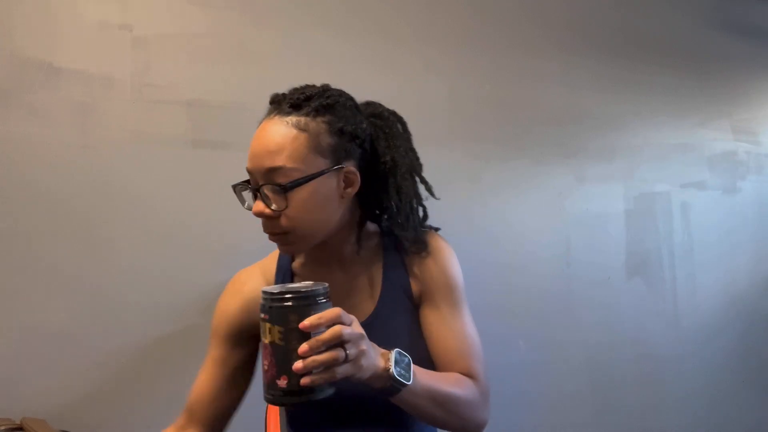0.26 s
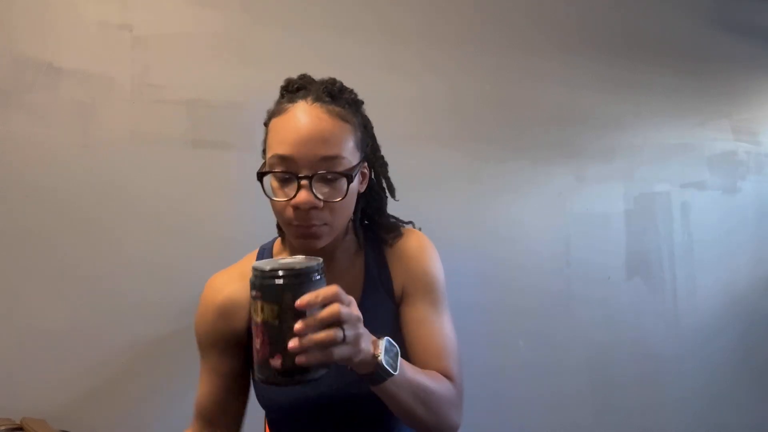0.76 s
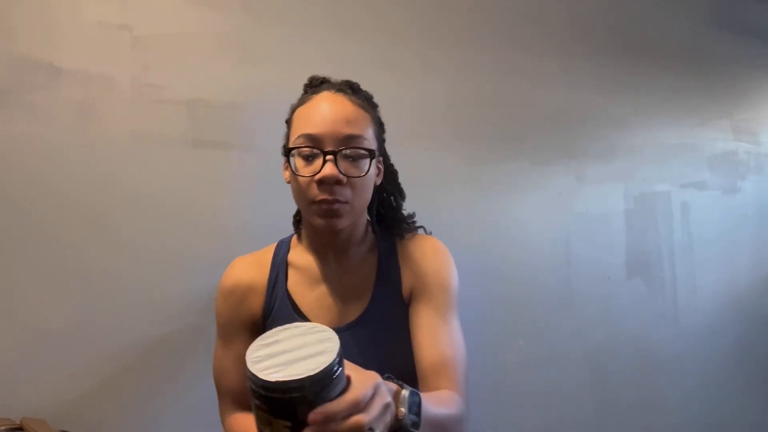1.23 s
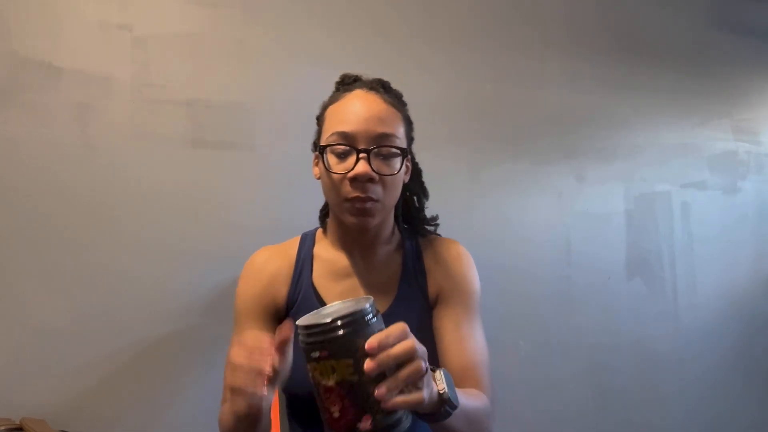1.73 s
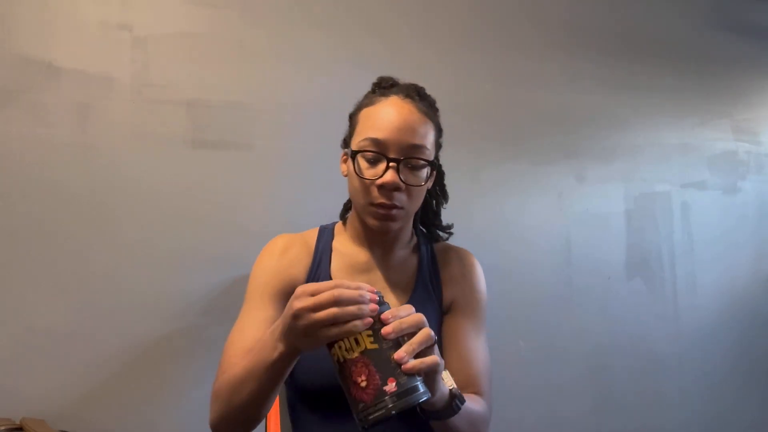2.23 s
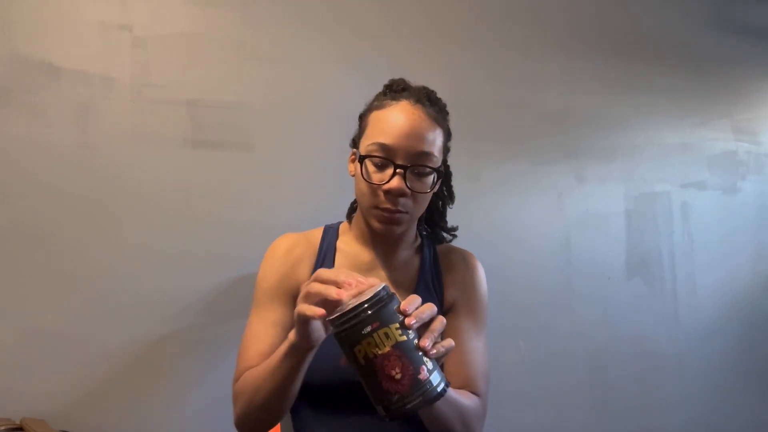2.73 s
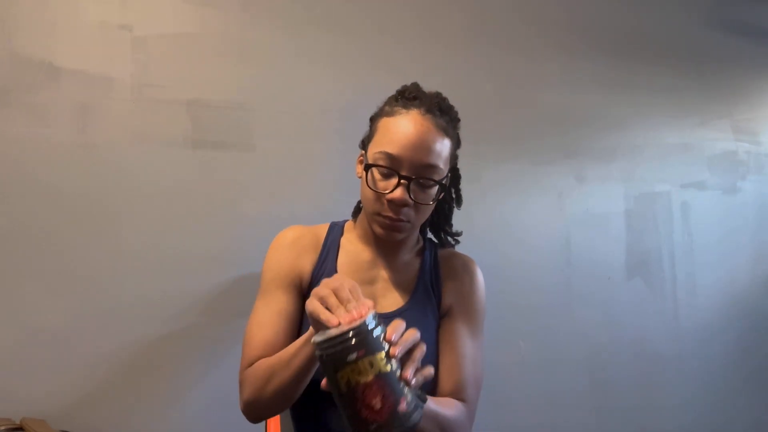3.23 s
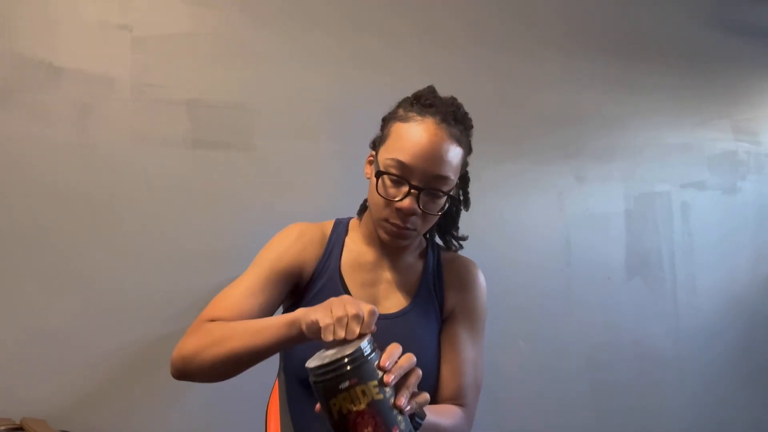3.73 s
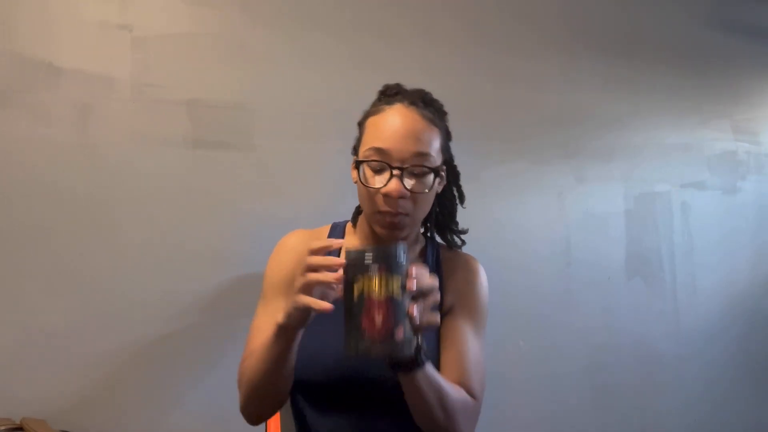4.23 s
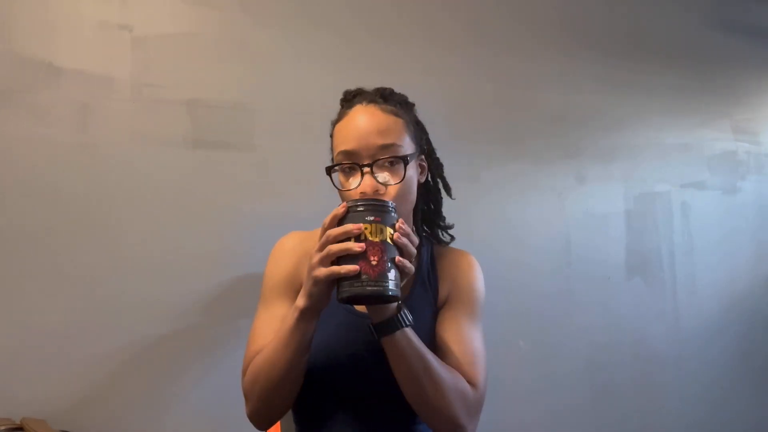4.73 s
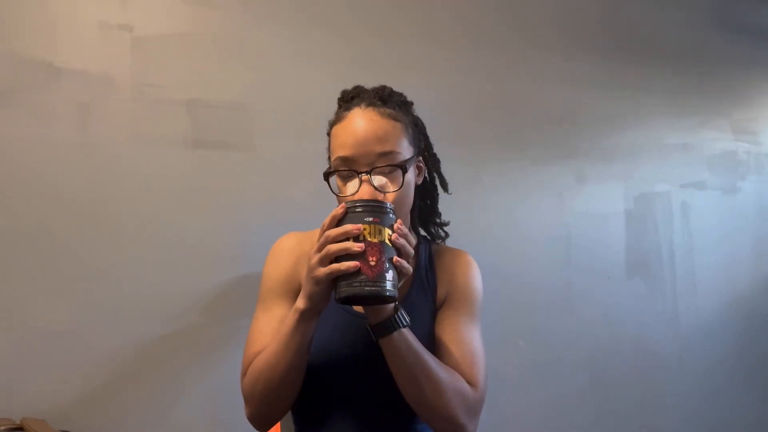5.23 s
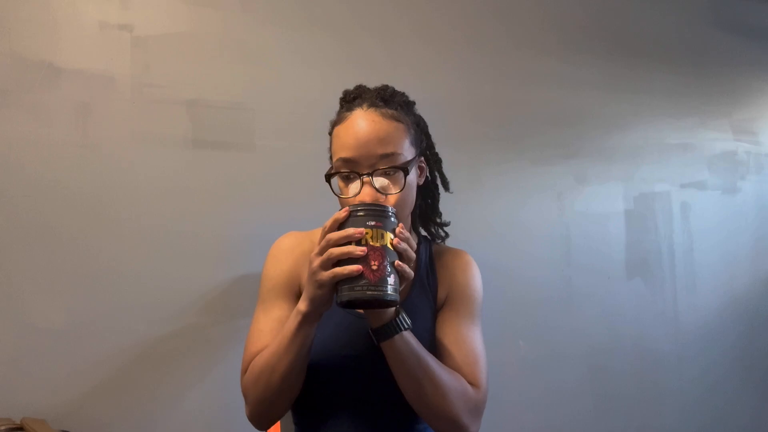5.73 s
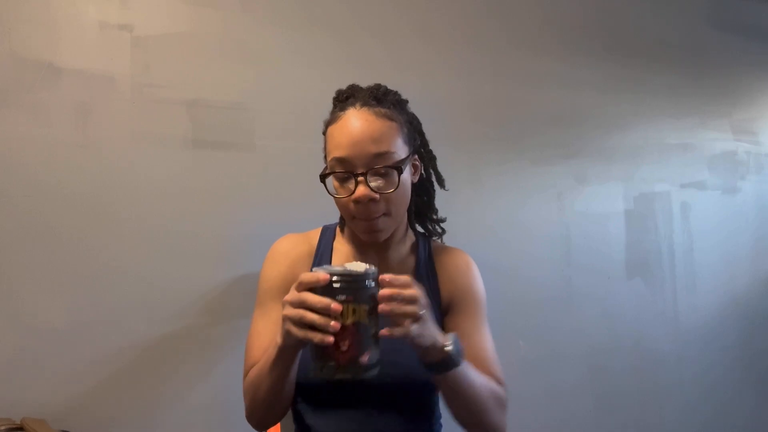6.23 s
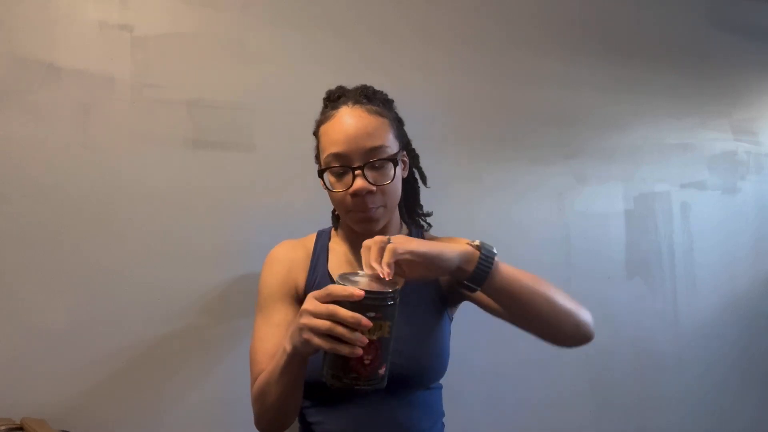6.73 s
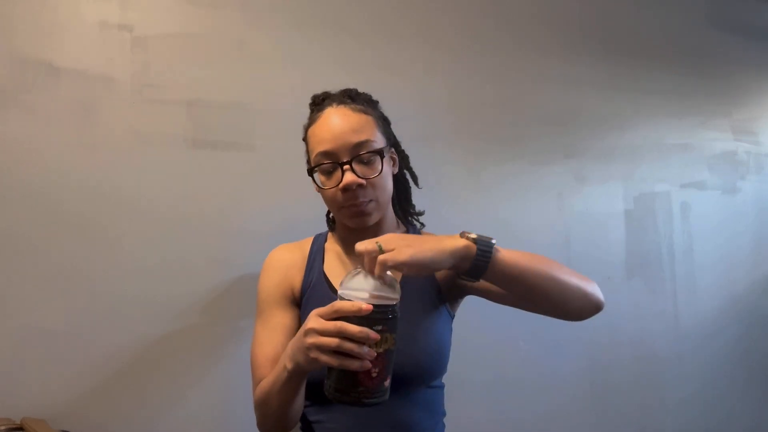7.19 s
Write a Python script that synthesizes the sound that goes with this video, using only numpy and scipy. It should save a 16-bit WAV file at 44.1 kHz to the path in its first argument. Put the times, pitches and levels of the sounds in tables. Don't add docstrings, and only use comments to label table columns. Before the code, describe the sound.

Hollow plastic knocks and small foil snaps over faint low rumble, indoors, then a brighter burst of crackly tearing as the seal lifts.

```python
import sys
import numpy as np
from scipy import signal
from scipy.fft import rfft, irfft, next_fast_len
from scipy.io import wavfile

SR = 44100
rng = np.random.default_rng(int(sys.argv[2]) if len(sys.argv) > 2 else 0)


def master(y):
    cut = np.clip(np.atleast_2d(y).T, -1, 1)
    pcm = np.round(cut * 32767)
    wavfile.write(sys.argv[1], SR, pcm.astype(np.int16))


def to_linear_factor(level_db):
    exponent = np.asarray(level_db, float) / 20
    return 10 ** exponent


N = 328809


def rms_one(x):
    return x / np.sqrt(np.mean(x ** 2) + 1e-20)


def in_time(rows):
    s, *columns = np.transpose(rows)
    return [np.interp(np.arange(N) / SR, s, c) for c in columns]


def while_sounding(rows):
    t = np.arange(N) / SR
    return (t >= rows[0][0]) & (t <= rows[-1][0])


def at_hz(points, hz):
    points_hz, values = np.array(points)[:, 0], np.array(points)[:, 1]
    return np.interp(np.log(np.maximum(hz, 1)), np.log(points_hz), values)


def colour(x, spectrum):
    size = next_fast_len(x.shape[-1])
    gain = to_linear_factor(at_hz(spectrum, np.fft.rfftfreq(size, 1 / SR)))
    return irfft(rfft(x, size) * gain, size)[..., :x.shape[-1]]


def band(x, low_hz, high_hz):
    return signal.sosfilt(signal.butter(2, [low_hz, high_hz], "band", fs=SR, output="sos"), x + 1e-18)


def drift(rate):
    r = np.exp(-80 * np.pi * rate / SR)
    noise = rng.standard_normal(N // 40 + 2002)
    slow = signal.lfilter([1], [1, -2 * r, r * r], noise)[2000:]
    return np.interp(np.arange(N) / 40, np.arange(len(slow)), rms_one(slow))


def ring(clicks, hz, t60):
    r, w = to_linear_factor(-60 / (t60 * SR)), 2 * np.pi * hz / SR
    return signal.lfilter([0, np.sin(w)], [1, -2 * r * np.cos(w), r * r], clicks + 1e-18)


def strike(rows, modes):
    rows, out = np.array(rows), np.zeros(N)
    luck = rng.standard_normal((len(rows), len(modes)))
    for k, (hz, level_db, t60) in enumerate(modes):
        clicks = np.zeros(N)
        clicks[(rows[:, 0] * SR).astype(int)] = to_linear_factor(rows[:, 1] + level_db + 3.5 * luck[:, k])
        out += ring(clicks, hz, t60) * (-1) ** k
    return out


def grains(per_s, spread_db):
    sizes = to_linear_factor(spread_db * np.minimum(rng.exponential(1, N), 5)) * rng.choice([-1, 1], N)
    return rms_one(sizes * (rng.random(N) < per_s / SR))


def stereo_bands(likeness, length, gain):
    out, edges = 0, 25 * 2 ** np.arange(0, 9.6, .5)
    white = rng.standard_normal((2, 2, length))
    for k, (low, high) in enumerate(zip(edges, edges[1:])):
        mid, side = band(white[k % 2], low, high)
        hz = np.sqrt(low * high)
        alike = np.clip(at_hz(likeness, hz), -1, 1)
        out = out + gain(hz) * (np.sqrt(1 + alike) * mid + np.sqrt(1 - alike) * side * [[1], [-1]])
    return out


# pitch_hz [Hz], level_db [dB per Hz]
FLOOR_SPECTRUM = [(24, -68), (40, -12.5), (90, -15), (102, -11.5), (124, -10.5), (180, -33), (225, -18.5),
                  (267, -21), (2580, -50.5), (6000, -54.5), (14500, -62.5)]
# start_s [s], level_db [dB]
FLOOR_LULL = [
    (4.87, -55.5),
    (5.03, -61),
    (5.5, -61.5),
    (6.84, -56.5),
]
# pitch_hz [Hz], likeness [-1..1]
FLOOR_LIKENESS = [(40, 1), (130, 0.46), (300, 0.37), (1000, 0.33), (8000, 0.19)]
# pitch_hz [Hz], width_hz [Hz], level_db [dB rms]
DUCT_MURMURS = [(69.4, 28, -66), (218.9, 23, -70)]
# pitch_hz [Hz], level_db [dB rms]
MAINS_HUM = [(120, -64)]


def floor():
    together, t, level_db = drift(4.5), np.arange(N) / SR, in_time(FLOOR_LULL)[0]
    swing_db = level_db - level_db.mean() + 0.6 * together

    def level(hz):
        unrest = np.clip(np.log2(1200 / hz) / 2, .1, 1)
        return to_linear_factor(at_hz(FLOOR_SPECTRUM, hz) + unrest * (swing_db + 3.5 * drift(3.6)))

    rumble = rms_one(band(stereo_bands(FLOOR_LIKENESS, N, level), 42, 14000))
    murmurs = 0
    for hz, width_hz, db in DUCT_MURMURS:
        noise = band(rng.standard_normal(N), hz - width_hz / 2, hz + width_hz / 2)
        murmurs = murmurs + to_linear_factor(db) * rms_one(noise)
    hum = 0
    for hz, db in MAINS_HUM:
        height = np.sqrt(2) * to_linear_factor(db + 2.1 * drift(5.2))
        hum = hum + height * np.sin(2 * np.pi * hz * t + .5 * drift(2.4))
    return to_linear_factor(level_db.mean() - 5.5) * rumble + murmurs + hum


# pitch_hz [Hz], t60_s [s]
ROOM_T60 = [(150, 1), (500, 0.71), (1400, 0.66), (3700, 0.49), (9000, 0.43), (15000, 0.077)]
# pitch_hz [Hz], level_db [dB]
ROOM_LEVEL = [(150, 4), (500, 1.5), (1500, -1), (5000, -1), (9000, -9), (15000, -4)]
# pitch_hz [Hz], likeness [-1..1]
TAIL_LIKENESS = [(150, 1), (400, 0.065), (3000, 0.067), (7000, 0.76), (9500, 0.27), (12000, 0.33),
                 (15000, 0.93)]


def room(x):
    t = np.arange(SR) / SR
    rise = np.clip((t - .003) / 0.0013, 0, 1)

    def decay(hz):
        t60 = at_hz(ROOM_T60, hz)
        unit_energy = np.sqrt(6 * np.log(10) / t60 / SR)
        return to_linear_factor(at_hz(ROOM_LEVEL, hz) - 60 * t / t60 - 9.6 * t ** 2) * unit_energy

    tail = rise * stereo_bands(TAIL_LIKENESS, SR, decay)
    size = next_fast_len(N + SR)
    return irfft(rfft(x, size) * (1 + rfft(tail, size)), size)[:, :N]


# pitch_hz [Hz], level_db [dB per Hz]
FOIL_SPECTRUM = [(700, -66), (1100, 8), (1400, 3), (2100, 3), (2750, 0.5), (4100, -0.5), (6200, -3.5),
                 (8300, -5), (10300, -8.5), (12000, -15.5), (15000, -9), (16000, -17), (16600, -65)]
# start_s [s], length_s [s], level_db once moving [dB], change_db by the end [dB]
RUBS = [(0.392, 0.18, -44, -16), (0.839, 0.2, -76.5, -16), (1.855, 0.25, -73, 3), (3.324, 0.2, -73.5, 13.5),
        (4.243, 0.3, -70, -7.5), (4.745, 0.1, -64.5, -14), (5.41, 0.12, -85.5, -6),
        (5.862, 0.3, -71.5, 4.5), (6.604, 0.18, -64.5, -40)]


def rubs():
    hiss = rms_one(colour(grains(5000, spread_db=2.5), FOIL_SPECTRUM))
    attack_s, touch_db = 0.01, -16.5
    level = 0
    for s, length, db, change_db in RUBS:
        stroke = [(s, db + touch_db), (s + attack_s, db), (s + length, db + change_db)]
        level = level + while_sounding(stroke) * to_linear_factor(in_time(stroke)[0])
    return hiss * level


# start_s [s], length_s [s],
# level_db [dB], pitch_hz [Hz], width_hz [Hz]
SCRATCHES = [(0.0, 0.017, -67.5, 1160, 1620), (0.854, 0.1, -73.5, 4940, 1520),
             (3.823, 0.01, -61, 1420, 300), (6.704, 0.081, -73, 1340, 700), (2.343, 0.044, -66, 5760, 895),
             (3.127, 0.013, -63, 4100, 700), (3.665, 0.026, -57, 2160, 688), (4.756, 0.032, -62, 4850, 500),
             (4.76, 0.034, -69, 2500, 815), (6.663, 0.022, -57, 1950, 680), (6.617, 0.017, -65, 3760, 905)]


def scratches():
    out = np.zeros(N)
    noises = rng.standard_normal((len(SCRATCHES), 8192))
    for (s, length, level_db, hz, width_hz), noise in zip(SCRATCHES, noises):
        t = np.arange(8192) / SR / length
        stroke = np.minimum(8 * t, 1) * np.clip(1.5 - t, 0, 1)
        tone = rms_one(band(noise, hz - width_hz / 2, hz + width_hz / 2))
        out[int(s * SR):int(s * SR) + 8192] += to_linear_factor(level_db) * stroke * tone
    return out


# start_s [s], level_db [dB peak]
THUDS = [
    (.197, -49.5),
    (.403, -34),
    (.47, -53),
    (1.21, -59),
    (1.26, -54),
    (7.3, -52),
]
# pitch_hz [Hz], level_db [dB], t60_s [s]
TABLE_MODES = [(123, -10.5, 0.1), (185.7, 0, 0.055), (246, -2, 0.035)]
# pitch_hz [Hz], level_db [dB], t60_s [s]
TUB_MODES = [(425, -9.5, 0.025), (500, -11, 0.042), (570, -11, 0.029), (736, -7, 0.031), (807, -4, 0.015),
             (1016, -16, 0.047), (1107, -8.5, 0.011), (1420, -14, 0.012)]
# start_s [s], level_db [dB peak], pitch_hz [Hz]
GRIPPED_KNOCKS = [(.403, -31, 345), (.435, -37.5, 400), (.529, -40, 472), (1.109, -33.5, 530),
                  (1.599, -70, 589), (1.95, -35.5, 395), (2.062, -40, 710), (2.314, -44.5, 336),
                  (2.35, -44.5, 482), (2.434, -37, 327), (2.75, -28.5, 430), (2.97, -54, 851),
                  (3.342, -35, 686), (3.398, -32, 700), (3.435, -39.5, 513), (3.744, -42.5, 540),
                  (4.306, -41, 708), (4.341, -43.5, 563), (4.399, -38.5, 477), (4.755, -42.5, 485),
                  (4.837, -44.5, 588), (5.631, -36, 799), (5.713, -31.5, 503), (5.972, -47, 390),
                  (6.094, -25, 712), (6.583, -46, 487), (6.665, -46.5, 574), (6.983, -34, 780)]
# start_s [s], level_db [dB peak], pitch_hz [Hz]
LOOSE_KNOCKS = [(.197, -47.5, 480), (.382, -38.5, 735), (.417, -37, 726), (.475, -31, 548),
                (.589, -46, 504), (.855, -43.5, 536), (0.892, -45, 470), (.964, -70, 480),
                (1.139, -38.5, 585), (1.169, -47, 508), (1.357, -48.5, 495), (1.512, -93, 370),
                (1.568, -58, 581), (1.956, -36.5, 600), (2.459, -44.5, 435), (2.785, -37, 546),
                (2.803, -37.5, 640), (2.89, -49, 714), (2.896, -29.5, 807), (3.665, -48.5, 534),
                (3.932, -46, 456), (3.943, -36, 561), (4.18, -46.5, 475), (4.257, -48, 382),
                (4.354, -42.5, 564), (4.442, -33.5, 502), (4.496, -52, 437), (6.183, -40, 610),
                (6.563, -66, 380), (6.884, -50, 363)]


def knocks():
    gripped_cycles, loose_cycles = 12.2, 32.5
    rows = [(*row, gripped_cycles) for row in GRIPPED_KNOCKS]
    rows = sorted(rows + [(*row, loose_cycles) for row in LOOSE_KNOCKS])
    tub, t = strike(rows, TUB_MODES), np.arange(4096) / SR
    for s, peak_db, hz, cycles in rows:
        note = to_linear_factor(peak_db - 1.0 - 60 * t * hz / cycles) * np.sin(2 * np.pi * hz * t)
        tub[int(s * SR):int(s * SR) + len(t)] += note
    hollow = band(band(tub, 303, 1900), 230, 2600)
    return hollow + band(strike(THUDS, TABLE_MODES), 130, 300)


# start_s [s], crack_db of plastic [dB], snap_db of foil [dB], pitch_hz of crack [Hz]
PAD_TAPS = [(0.8534, -43.5, -44.5, 2470), (1.048, -62, -55.5, 2530), (1.1104, -45, -56.5, 1570),
            (1.138, -47.5, -60, 2040), (1.955, -32.5, -34, 1420), (2.7537, -28, -39.5, 1530),
            (2.786, -48, -46, 1780), (2.8006, -40, -48, 1420), (2.8977, -28, -29.5, 1320),
            (2.9007, -41, -32, 1650), (2.982, -40.5, -39, 1960), (3.744, -37.5, -45, 2960),
            (3.7452, -37, -48.5, 1340), (3.9232, -73, -39, 1730), (3.933, -35.5, -39, 3320),
            (4.3078, -43, -55, 1410), (4.4018, -46, -62, 1390), (4.4425, -41.5, -51.5, 1730),
            (4.7548, -42, -44, 2110), (4.8378, -43, -55.5, 1400), (5.634, -33, -30, 2430),
            (5.66, -37, -23, 2700), (5.7145, -35, -33, 2010), (5.9747, -47, -44.5, 3260),
            (6.096, -34.5, -35, 1820), (6.183, -44.5, -49.5, 2600), (6.6627, -44, -72, 2040),
            (6.9228, -49.5, -43, 3230), (7.0643, -36, -18, 2160), (7.3389, -38, -24, 2100)]
# start_s [s], crack_db of plastic [dB], snap_db of foil [dB], pitch_hz of crack [Hz]
CREASES = [(0.1975, -54, -96, 1420), (0.402, -50, -36, 3000), (.409, -31.5, -37, 1320),
           (0.4159, -28, -26, 1420), (0.4364, -54, -49, 1550), (.8944, -59, -57, 2330),
           (1.3571, -58.5, -86, 1550), (1.733, -68, -76, 2640), (1.868, -71, -61, 2600),
           (2.0635, -40.5, -74.5, 1950), (2.3143, -52.5, -58.5, 1510), (2.436, -46, -46.5, 2290),
           (2.817, -36.5, -37, 2000), (3.344, -40.5, -73, 1760), (3.4454, -34.5, -32.5, 2620),
           (3.665, -52, -91, 2600), (3.947, -39, -40, 1640), (4.35, -46.5, -73, 1370),
           (4.495, -54, -78, 2530), (5.5946, -34, -42, 3080), (5.6118, -38, -47, 2230),
           (5.6213, -33.5, -36, 2100), (6.618, -62, -61, 2730), (6.884, -48.5, -53.5, 2030),
           (6.994, -42, -28, 2270), (7.0106, -45, -28, 2270), (7.027, -36, -20, 2480),
           (7.0826, -22, -27, 3000), (7.124, -23.5, -42, 2960), (7.3961, -22, -20, 3150)]
# start_s [s], crack_db of plastic [dB], snap_db of foil [dB], pitch_hz of crack [Hz],
# tick_db against the snap [dB]
NAIL_PICKS = [(.382, -36.5, -42, 3420, -3), (0.751, -58, -68, 1470, 0), (2.2795, -63, -61, 1650, 1),
              (2.351, -47, -40, 2250, -8), (2.4465, -45, -62, 2030, 14), (3.131, -48, -42.5, 1620, -3.5),
              (3.4349, -34.5, -32.5, 2900, -26), (3.512, -42, -56, 2780, -7), (4.2604, -57, -58, 1550, 4),
              (5.5594, -68, -79, 3150, -4.5), (5.6404, -35.5, -56, 2320, -1.5),
              (6.568, -58.5, -85, 1500, -10), (6.9841, -34, -21, 2170, -5),
              (7.0009, -52, -19.5, 2230, -3.2), (7.1042, -20.5, -31.5, 3100, -15),
              (7.3123, -36, -16, 2160, -9), (7.4146, -36, -35, 1540, 6)]


def snaps():
    out, t = np.zeros(N + 1024), np.arange(1024) / SR
    pad_tick_db, crease_tick_db = -34, -13
    rows = [(*row, pad_tick_db) for row in PAD_TAPS] + [(*row, crease_tick_db) for row in CREASES]
    rows = sorted(rows + NAIL_PICKS)

    def burst(t60):
        return np.minimum(t / .0006, 1) * to_linear_factor(-60 * t / t60)

    noises = rng.standard_normal((len(rows), 1024))
    for (s, crack_db, snap_db, hz, tick_db), noise in zip(rows, noises):
        noise = noise + 4.78 * (np.arange(1024) == 26)
        top_hz = np.clip(8800 + 200 * (snap_db - crack_db), 5000, 8600)
        crack = band(band(noise * burst(.007), hz / 1.5, hz * 1.5), hz / 1.8, hz * 1.7)
        snap = band(band(noise * burst(.004), 3300, top_hz), 3000, 1.15 * top_hz)
        tick = band(noise * burst(.005), 9500, 16800)
        parts = (crack, crack_db + 1.5), (snap, snap_db + 0.7), (tick, snap_db + tick_db + 1.5)
        for part, level_db in parts:
            out[int(s * SR):int(s * SR) + 1024] += to_linear_factor(level_db) * part / np.abs(part).max()
    return out[:N]


# start_s [s], level_db of crackle, the pull [dB], pitch_hz of the air in the tub [Hz],
# cupped_db of drone over crackle, the cupping hand [dB]
PEELS = [
    [(5.57, -85, 600, 11), (5.596, -50.5, 590, 1), (5.636, -43.5, 570, -2.8), (5.7, -56, 570, 8.8)],
    [(6.984, -52.5, 760, 5.5), (7.07, -35, 764, -4), (7.09, -40, 630, 7.5), (7.13, -40.5, 435, -6),
     (7.19, -48, 293, -4), (7.24, -45.5, 775, 5), (7.35, -39.5, 935, 10), (7.4, -40.5, 980, -6.5),
     (7.456, -73, 850, 32)],
]


def peel():
    out, release = np.zeros(N), grains(1800 * to_linear_factor(6.0 * drift(50)), spread_db=3.5)
    crackle = rms_one(colour(release, FOIL_SPECTRUM))
    sheen = band(crackle, 4500, 18000)
    crackle_db, mouth_hz, cupped_db = in_time(sum(PEELS, []))
    drone = 0
    for hz in np.geomspace(260, 1100, 14):
        nearness = np.exp(-(np.log(hz / mouth_hz) / 0.21) ** 2)
        drone = drone + rms_one(ring(release, hz, 0.026)) * (0.02 + nearness)
    drone = rms_one(band(drone, 191, 1400))
    slack_db, taut_db, tighten_s = -1, 4, 0.09
    for rows in PEELS:
        start_s = rows[0][0]
        tension_db, = in_time([(start_s, slack_db), (start_s + tighten_s, taut_db)])
        foil = crackle + (to_linear_factor(tension_db) - 1) * sheen
        out += while_sounding(rows) * to_linear_factor(crackle_db + 1.5) * (foil + to_linear_factor(cupped_db - 4.5) * drone)
    return out


def scene():
    return room(knocks() + snaps() + scratches() + peel() + rubs()) + floor()


def band_limit(x):
    return signal.sosfilt(signal.butter(12, 16780, fs=SR, output="sos"), x)


# pitch_hz [Hz], lead of the right port [rad]
RIGHT_LEAD = [(0, 0), (2000, .7), (6500, 1.1), (7700, 0), (8300, -1.6), (16500, -11.7)]


def record(dry):
    size = next_fast_len(N + 1024)
    lead = np.interp(np.fft.rfftfreq(size, 1 / SR), *np.transpose(RIGHT_LEAD))
    turn = np.exp(.5j * lead * np.array([[-1], [1]]))
    ports = irfft(rfft(dry, size) * turn, size)[:, :N]
    ports = signal.sosfilt(signal.cheby2(12, 50, 16600, fs=SR, output="sos"), ports)
    ports = .17 * np.tanh(ports / .17)
    return band_limit(ports)


dry = scene()
out = record(dry)
master(out)
```